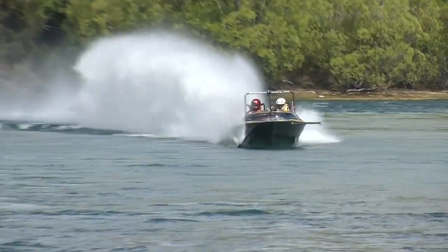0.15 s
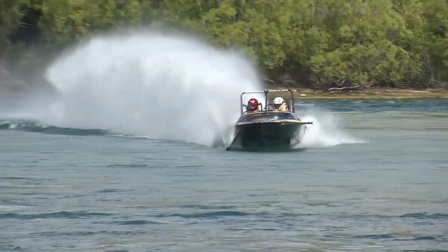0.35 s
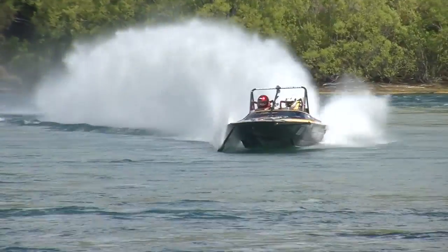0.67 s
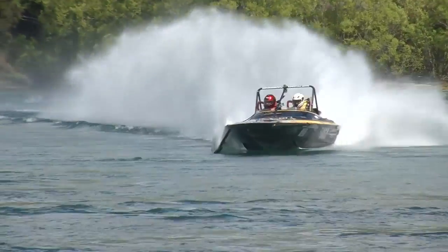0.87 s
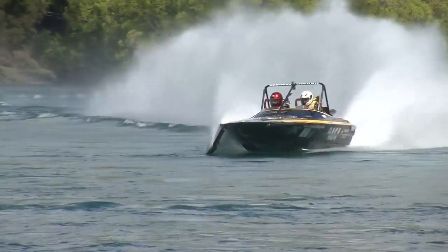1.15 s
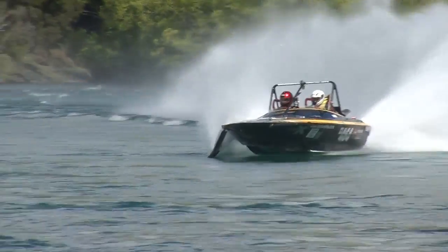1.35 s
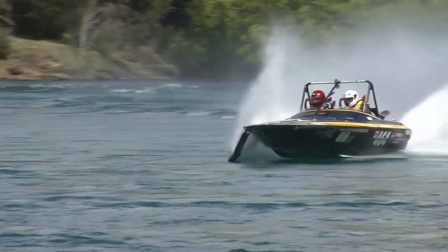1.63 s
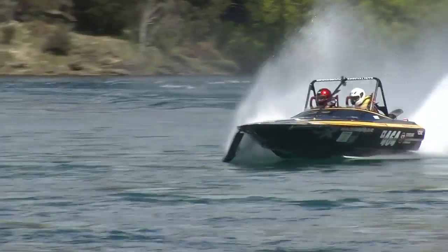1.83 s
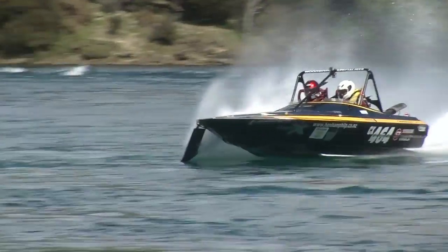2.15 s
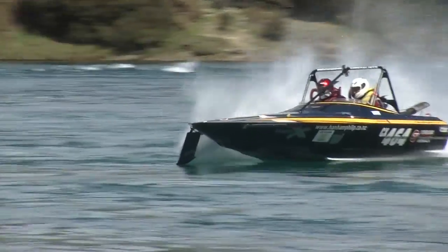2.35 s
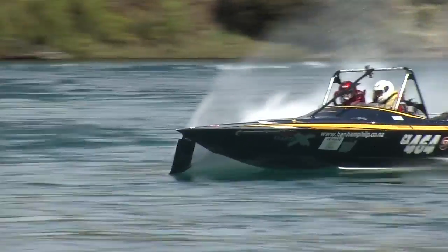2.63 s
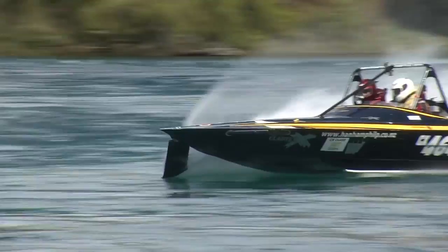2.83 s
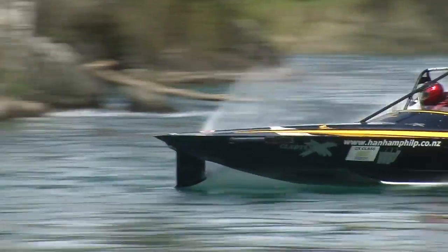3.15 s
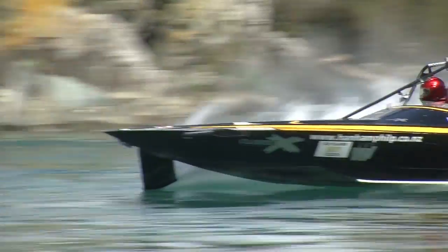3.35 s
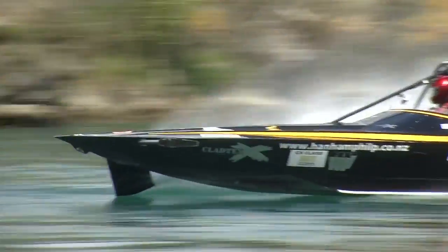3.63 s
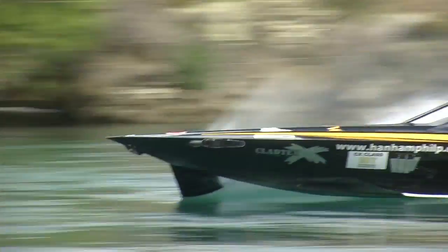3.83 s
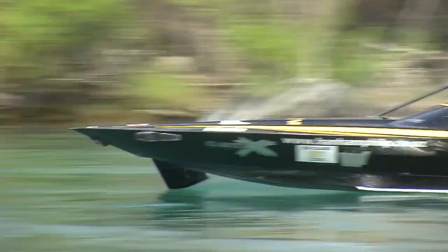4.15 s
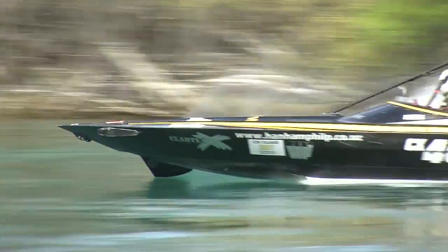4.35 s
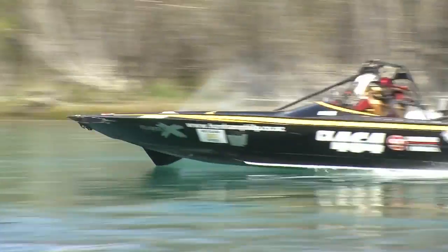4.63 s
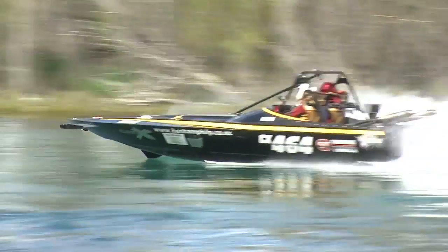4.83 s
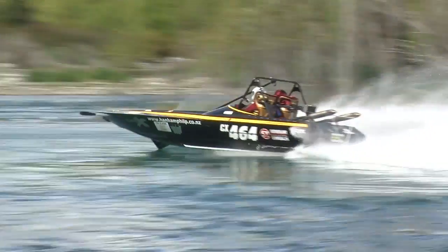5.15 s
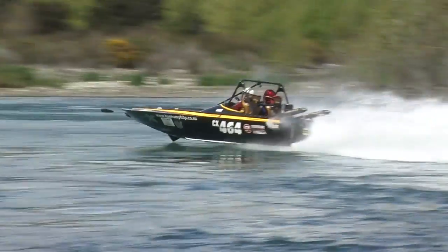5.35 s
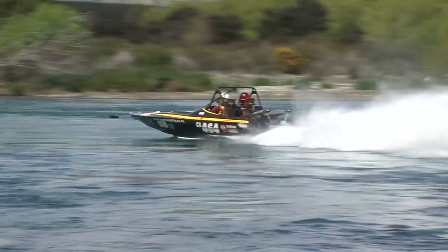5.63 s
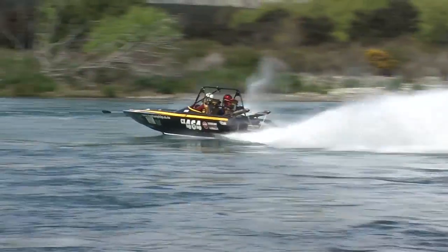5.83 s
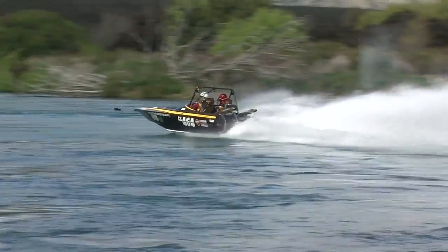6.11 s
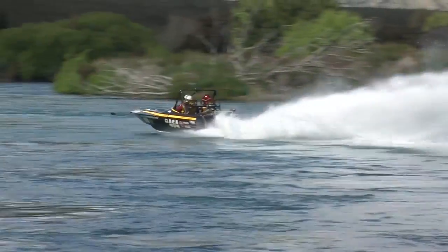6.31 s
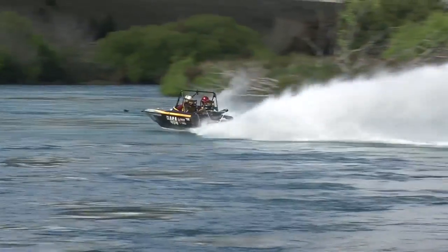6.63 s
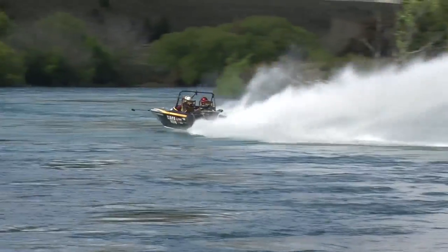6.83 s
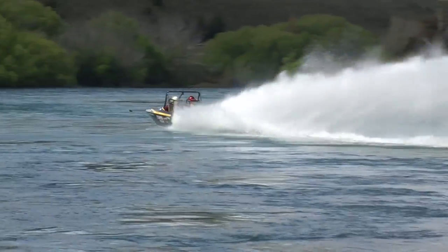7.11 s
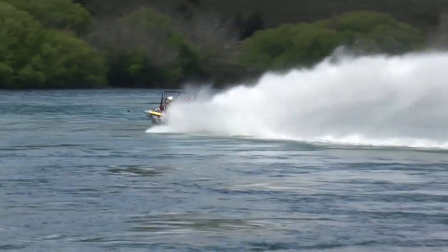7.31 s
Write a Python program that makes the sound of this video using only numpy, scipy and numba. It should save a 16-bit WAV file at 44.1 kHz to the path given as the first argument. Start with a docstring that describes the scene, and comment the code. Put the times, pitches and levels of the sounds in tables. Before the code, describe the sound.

At 0 s a V8 racing jet boat is already loud, coming toward the shore with a dense, lumpy open-exhaust drone, strong low boom and mid-range buzz. A fainter, lower-pitched return from the far bank makes it beat; tiny drops tick. From about 1.2 s the note slides gradually lower and spray begins to build. Around 2.7 s the engine eases off, its pitch falling sharply and roughening, while sheets of water rush and hiss until about 3.3 s. By 3.6 s the pitch has climbed back, raspy and full, passing close by. Near 5.1 s it drops abruptly again, then rises slowly. From 5.5 to 7.5 s the boat runs away, still loud, with throbbing firings, swelling roar around 6.2 s, airy jet wash and deep wake rumble. Outdoor microphone, strongly limited, sounding on the left; the right holds faint electronic hiss.

```python
"""On a river shore: a V8 racing jet boat comes up, eases off through a turn in a hiss of spray, passes and runs away.
Two open exhaust stacks give a lumpy note of engine orders that changes with the side they are heard from,
with noisy puffs at each firing. The far bank returns the note at a lower Doppler pitch, so it beats.
Coloured noise makes spray, drops and the rumble of the wake. A limited microphone carries the scene
on the left channel; the right holds only faint hiss."""
import sys
import numpy as np
from scipy import signal
from scipy.fft import rfft, irfft, next_fast_len
from scipy.io import wavfile
from scipy.ndimage import uniform_filter1d
from numba import njit

SR = 44100
rng = np.random.default_rng(int(sys.argv[2]) if len(sys.argv) > 2 else 0)


def output_pcm(signal):
    """Save a mono or channel-first signal as 16-bit PCM at the path in sys.argv[1].

    Samples are clipped to [-1, 1] before scaling.
    """
    pcm = np.clip(np.atleast_2d(signal).T, -1, 1) * 32767
    wavfile.write(sys.argv[1], SR, np.round(pcm).astype(np.int16))


N = 329427
TIME = np.arange(N) / SR


def undb(db):
    """Turn decibels into gain."""
    return 10 ** (np.asarray(db) / 20)


def unit(x):
    """Scale a sound to rms 1."""
    return x / np.sqrt(np.mean(x ** 2))


def curves(table):
    """Join each column of a table by straight lines in time."""
    s, *columns = np.transpose(table)
    return [np.interp(TIME, s, c) for c in columns]


def noise():
    """White noise: all pitches equally strong."""
    return rng.standard_normal(N)


def walk(rate):
    """Slow chance: random levels 1 / rate seconds apart, joined by straight lines; spread near 1."""
    step = max(int(SR / rate), 1)
    levels = rng.standard_normal(N // step + 2)
    lines = levels[:-1, None] + np.diff(levels)[:, None] * np.arange(step) / step
    return np.sqrt(3 / 2) * lines.ravel()[:N]  # makes up for the spread lost between levels


def colour(x, points):
    """Shape a sound by (Hz, dB) points, fading away outside them; rms 1."""
    hz, db = np.transpose(points)
    size = next_fast_len(N)
    freqs = np.maximum(np.fft.rfftfreq(size, 1 / SR), 1)
    gain = undb(np.interp(np.log(freqs), np.log(hz), db))
    gain = gain * np.minimum(hz.max() / freqs, 1) ** 2
    gain = gain * np.minimum(freqs / hz.min(), 1) ** 2
    return unit(irfft(rfft(x, size) * gain, size)[:N])


# How the boat turns past the listener.
# Each row: time in seconds, bearing in degrees (0 is bow on, 180 is stern on).
BEARING = [(0, 15.6), (1.22, 18.7), (1.45, 40.3), (2.2, 51), (2.62, 54.7), (2.9, 61), (3.08, 62.1),
           (3.42, 68), (3.78, 85), (4.5, 95.7), (4.92, 97.6), (5.25, 115), (5.48, 121), (5.72, 127),
           (6.0, 139), (6.28, 141), (6.65, 153), (6.88, 156), (7.47, 157)]


def by_side(table):
    """Read each column of a table of bearings as the boat turns past the listener."""
    bearing, = curves(BEARING)
    angles, *columns = np.transpose(table)
    return [np.interp(bearing, angles, c) for c in columns]


def swell(peak, rise, fall):
    """An envelope that builds up smoothly and dies away."""
    age = TIME - peak
    return np.exp(-(np.minimum(age, 0) / max(rise, .005)) ** 2 - np.maximum(age, 0) / max(fall, .005))


def with_swells(steady_db, events):
    """Gains of several layers: their steady levels plus every event's swell, summed in power."""
    power = undb(steady_db) ** 2
    for peak, rise, fall, *db in events:
        power = power + np.outer(undb(db) ** 2, swell(peak, rise, fall) ** 2)
    return np.sqrt(power)


# Engine speed as heard. Each row: time in seconds, four-stroke cycles per second (before the small wander).
CYCLE_SPEED = [(0.0, 44.84), (1.25, 42.2), (1.39, 40.83), (1.89, 39.36), (2.25, 38.8), (2.6, 39.32),
               (2.79, 34.95), (2.95, 34.2), (3.13, 33.82), (3.55, 39.45), (3.76, 40.64), (4.1, 39.95),
               (4.58, 38.56), (4.95, 38.3), (5.16, 35.1), (5.28, 35.42), (5.45, 36.4), (5.8, 36.98),
               (6.23, 38.67), (6.55, 38.97), (6.8, 39.76), (7.05, 39.56), (7.47, 39.33)]


def engine_turns(shudder=.0018, surging=0.001):
    """Count engine cycles; the speed wanders by small shares, quickly and slowly, as the pump's load changes."""
    cycle_hz, = curves(CYCLE_SPEED)
    wander = 1 + shudder * walk(40) + surging * walk(6)
    return np.cumsum(cycle_hz * wander) / SR


def order_levels(side):
    """List one side's exhaust note as gains of the orders 0 to 45."""
    gains = np.zeros(46)
    for order, db in side:
        gains[order] = undb(db)
    return gains


def push(note, size=220):
    """Strength of the note from firing to firing, relative to its mean over a few cycles (size in samples)."""
    power = uniform_filter1d(uniform_filter1d(note ** 2, size), size // 2) + 1e-9
    return np.sqrt(power / uniform_filter1d(power, 20 * size))


# The exhaust note heard from each side, from bow to stern.
# Each row: order (multiple of the cycle speed), level in dB before flutter.
HEAD_ON = [(2, -56.5), (3, -40), (4, -44), (6, -31), (7, -38), (9, -45), (10, -37.5), (11, -40), (12, -50),
           (13, -43), (15, -52), (16, -41), (17, -51.5), (21, -58), (23, -54.5), (24, -52.5)]
BOW = [(2, -60), (3, -42), (4, -52), (6, -32), (7, -41.5), (9, -45), (10, -36.5), (11, -36), (12, -52.5),
       (13, -51.5), (14, -47.5), (16, -49.5), (18, -49.5), (21, -53), (23, -59), (26, -60.5)]
SHOULDER = [(2, -59), (3, -37.5), (6, -27.5), (7, -46.5), (9, -40), (10, -50), (11, -42.5), (12, -47.5),
            (13, -34.5), (14, -48.5), (15, -53.5), (16, -52.5), (17, -41), (18, -51), (19, -46.5),
            (21, -49.5), (22, -62), (25, -60.5), (29, -59), (34, -64)]
FORE = [(2, -57.5), (3, -43), (6, -35.5), (7, -34), (9, -35), (11, -37.5), (12, -47), (13, -32),
        (15, -40.5), (16, -42), (17, -45.5), (20, -45.5), (21, -41.5), (22, -44.5), (27, -46), (32, -49.5),
        (33, -53.5), (34, -48)]
FLANK = [(2, -58.5), (3, -38.5), (6, -36), (7, -35), (9, -34), (11, -32), (12, -44), (13, -32.5),
         (14, -55.5), (15, -49.5), (16, -40), (17, -50), (19, -53.5), (20, -49), (21, -51.5), (22, -59.5),
         (24, -57), (27, -55), (29, -62), (32, -60), (33, -57), (34, -56)]
BEAM = [(2, -61.5), (3, -37), (4, -52.5), (6, -45.5), (7, -34.5), (9, -31.5), (10, -39.5), (11, -32.5),
        (12, -42.5), (13, -45.5), (14, -39.5), (16, -42), (17, -46), (19, -42.5), (21, -39.5), (22, -48),
        (24, -45.5), (27, -47.5), (29, -47.5), (31, -50.5), (32, -50.5), (33, -53), (34, -58), (37, -57.5),
        (39, -59.5)]
ABAFT = [(2, -60.5), (3, -38), (4, -50.5), (6, -44.5), (7, -33.5), (9, -30), (10, -41.5), (11, -36),
         (12, -44), (13, -52), (14, -40.5), (16, -43.5), (19, -40.5), (21, -39.5), (22, -47.5), (24, -47),
         (27, -49), (29, -50), (31, -52), (32, -50.5), (33, -48.5), (36, -54.5)]
AFT = [(3, -38.5), (4, -49.5), (6, -35.5), (7, -35), (9, -29.5), (10, -41), (11, -33.5), (12, -42.5),
       (13, -34.5), (14, -56.5), (16, -48), (19, -48.5), (21, -38.5), (22, -50), (25, -49.5), (27, -48),
       (28, -50.5), (29, -53), (30, -47.5), (32, -42.5), (34, -53.5), (37, -63)]
QUARTER = [(3, -36), (4, -49), (6, -35.5), (7, -31), (9, -28), (10, -39), (11, -28.5), (12, -48), (13, -37),
           (15, -44.5), (16, -43), (17, -44.5), (18, -42), (19, -47), (20, -43.5), (21, -42), (22, -42.5),
           (23, -39), (24, -49.5), (25, -37.5), (27, -47.5), (29, -58.5), (32, -51.5), (34, -58.5),
           (43, -63.5), (45, -55)]
TRANSOM = [(3, -38), (4, -47), (6, -35), (7, -39.5), (9, -27), (10, -48), (11, -35), (12, -49), (13, -35),
           (15, -40.5), (17, -41.5), (18, -45), (19, -43.5), (20, -46.5), (21, -49.5), (22, -43), (24, -50),
           (26, -48.5), (29, -48.5), (35, -48.5), (37, -56.5), (43, -58.5)]
STERN = [(3, -38), (4, -40), (6, -32), (7, -30), (9, -35.5), (10, -34), (11, -33), (12, -42), (13, -36.5),
         (14, -47), (15, -38.5), (16, -43), (17, -49.5), (18, -58.5), (19, -41.5), (20, -48), (21, -40),
         (22, -46), (24, -61), (26, -48), (29, -56.5), (32, -52.5), (34, -55), (35, -54), (37, -59.5),
         (43, -59)]
# Where those notes are heard. Each row: bearing in degrees, the note's table.
NOTES = [(16, HEAD_ON), (18, BOW), (52, SHOULDER), (61, FORE), (68, FLANK), (86, BEAM), (90, BEAM),
         (96, ABAFT), (102, ABAFT), (120, AFT), (131, QUARTER), (144, TRANSOM), (158, STERN)]
# The two strongest orders by side.
# Each row: bearing in degrees, boom at order 5 in dB, firing tone at order 8 in dB, both before flutter.
LEADING_ORDERS = [(16.2, -31, -25.5), (17.78, -30.5, -23), (39, -24.5, -28), (49.8, -26.5, -25),
                  (55.7, -23.5, -35), (60.7, -24.5, -26), (67.5, -22.5, -42.5), (85, -23.5, -28.5),
                  (96.3, -23, -30.5), (104, -23.5, -30.5), (122, -24.5, -48.5), (134, -22, -39),
                  (146, -24, -32), (156, -24, -29)]
# Throb once a cycle. Each row: bearing in degrees, extra contrast between strong and weak firings (0 to 1).
THROB = [(60, 0.05), (95, 0.1), (122, 0.3), (145, 0.45), (160, 0.3)]
# Uneven burning, worst off the throttle. Each row: time in seconds, scatter of the orders' strength in dB.
ROUGHNESS = [(0, 0.4), (2.5, 1.6), (2.8, 2), (3.3, 4), (3.7, 0.2), (4.95, 1), (5.15, 2.2), (5.5, 0.2),
             (6.3, 0.7), (6.6, 1.5), (7.47, 2)]
# Firing slots of the near cylinder bank. Each entry: a slot in eighths of a cycle.
NEAR_BANK_SLOTS = [0, 3, 5, 6]
# Strength of the near bank's four cylinders. Each entry: relative level in dB.
CYLINDER_DB = [-1, -2, -6, -4]


def exhaust_note(turns, pipe_lag=0.95, mouth_rad=1.32, blur_rad=0.26, flutter_db=1.02, fade_db=0.8,
                 boom_flutter_db=1.49, stumble=.3, drift_rad=.6, bank_boom_db=-18):
    """Add up the engine orders of the exhaust note, low and high, as sent to the shore and as sent astern."""
    boom_db, firing_db = by_side(LEADING_ORDERS)
    bearing, = curves(BEARING)
    rough_db, = curves(ROUGHNESS)
    angles = [angle for angle, _ in NOTES]
    gains = np.array([order_levels(side) for _, side in NOTES])
    leading = {5: undb(boom_db), 8: undb(firing_db)}
    astern_gains = gains[-1].copy()
    astern_gains[5] += undb(bank_boom_db)
    direct, astern = 0, 0
    for k in sorted(set(np.flatnonzero(gains.sum(axis=0))) | set(leading)):
        # uneven firing of one bank sets how the orders line up
        slot_phases = np.exp(-2j * np.pi * k * np.array(NEAR_BANK_SLOTS) / 8)
        pattern = (undb(CYLINDER_DB) * slot_phases).sum()
        # short waves arrive by many paths over the water, so their phases drift apart
        drift = 2 * np.pi * rng.random() + drift_rad * walk(9) + blur_rad * rough_db * walk(35)
        drift = np.clip((k - 12) / 6, 0, 1) * drift
        # the pipe lets the low orders out first; its open mouth turns them all
        pipe_phase = mouth_rad + 2 * np.pi * pipe_lag * np.log(k) ** 2
        phase = 2 * np.pi * k * turns + drift + np.angle(pattern + 1e-6) + pipe_phase
        tone = np.sqrt(2) * np.cos(phase)
        if k in leading:
            gain = leading[k] * undb(boom_flutter_db * walk(10))
        else:
            gain = np.interp(bearing, angles, gains[:, k])
            # paths over the waves flutter and fade
            gain = gain * undb(flutter_db * walk(13) + fade_db * walk(2.977))
            # uneven burning trades strength among the orders
            gain = gain * undb(rough_db * walk(24))
        direct = direct + gain * tone
        astern = astern + astern_gains[k] * tone
    # from astern the strong firings stand out and the weak ones leave a gap once a cycle
    throb = direct * (push(direct) ** by_side(THROB)[0] - 1)
    above_boom = signal.butter(4, 150, "high", fs=SR, output="sos")
    direct = direct + signal.sosfiltfilt(above_boom, throb)
    return direct * undb(stumble * rough_db * walk(45)), astern


# Firing slots of the far cylinder bank. Each entry: a slot in eighths of a cycle.
FAR_BANK_SLOTS = [1, 2, 4, 7]


def firings(turns, far_stack_db=-9, stack_lag_s=0.00088, jitter_s=.00005, scatter_db=2):
    """Make a pulse per cylinder; the far stack is weaker and arrives a little later."""
    slots = np.arange(int(turns[-1] * 8))
    chance = rng.standard_normal((len(slots), 2))
    far = np.isin(slots % 8, FAR_BANK_SLOTS)
    times = np.interp(slots / 8, turns, TIME)
    at = np.clip((times + far * stack_lag_s + jitter_s * chance[:, 0]) * SR, 0, N - 2)
    size = undb(far * far_stack_db + scatter_db * chance[:, 1])
    # share each pulse between the two samples around its exact time
    whole = at.astype(int)
    early = np.bincount(whole, size * (1 - at + whole), N)
    late = np.bincount(whole + 1, size * (at - whole), N)
    return early + late


@njit
def ring(x, hz, width):
    """Ring like a hollow pipe: a state-variable band-pass whose centre moves."""
    out, band, low = np.empty(len(x)), 0., 0.
    for i in range(len(x)):
        g, k = np.tan(np.pi * hz[i] / SR), width / hz[i]
        v = (band + g * (x[i] - low)) / (1 + g * (g + k))
        band, low, out[i] = 2 * v - band, low + 2 * g * v, k * v
    return out


# Level of the exhaust's rasp. Each row: time in seconds, level in dB before the mix and trims.
RASP_LEVEL = [(0.0, -43), (0.65, -45), (1.02, -41.5), (2.14, -38.5), (3.01, -34.5), (3.35, -37.5),
              (3.83, -34), (4.5, -37), (4.8, -38), (5.08, -44), (5.3, -35), (6.2, -26.5), (6.36, -33.5),
              (6.62, -34), (7.1, -32.5), (7.47, -35.5)]
# What the rasp is made of, by side.
# Each row: bearing in degrees, roar in dB, bark of the firings in dB, both added to the rasp level.
RASP_MIX = [(18, 9.5, -4), (58.3, 5, -6), (80, -1.5, -15), (94, 2.5, -4), (118.4, 1.5, -6),
            (129, -6.5, -14.5), (170, -3, -7.5)]
# Brief swells of the exhaust.
# Each row: peak time, rise and fall in seconds, then roar and bark in dB before trims.
EXHAUST_SWELLS = [(2.5, 0.12, 0.098, -37, -42), (2.92, .1, 0.38, -35.5, -35), (3.6, .03, 0.051, -35, -40),
                  (4.32, .15, .2, -44, -41.5), (5.83, 0.092, .2, -39, -40.5),
                  (6.6, 0.061, 0.083, -33, -33.5), (6.76, 0.041, 0.081, -33, -40),
                  (7.44, 0.09, 0.19, -27, -48)]
# The mouth of the stack rings at a pitch that shifts as the boat turns.
# Each row: bearing in degrees, ring in Hz, its level in dB within the bark.
STACK_RING = [(18, 930, -14.5), (55, 800, -11), (58.7, 600, -12), (67.5, 840, -16), (88, 1000, -9),
              (92.8, 1500, -5), (102, 1000, -7), (120.7, 1300, -6.5), (127.6, 920, 0), (141.3, 1300, -11.5),
              (160, 940, -13.5)]
# Tone colour of the turbulent roar. Each row: frequency in Hz, relative level in dB.
ROAR_COLOUR = [(40, -42.5), (60, -25), (85, -10), (130, 2), (200, 2), (330, 8), (480, 4), (600, 3),
               (780, 0.5), (1000, -9.5), (1500, -22.5), (3000, -45)]
# Tone colour of the bark of each firing. Each row: frequency in Hz, relative level in dB.
BARK_COLOUR = [(300, -41.5), (520, -8.5), (700, 0), (900, -3), (1150, 12.5), (1450, -0.5), (1750, -17),
               (2500, -30.5), (5000, -48.5)]
# Tone colour of the puffs of gas. Each row: frequency in Hz, relative level in dB.
GAS_COLOUR = [(500, -22.5), (850, 1), (1100, 1), (1500, -11.5), (1900, -16), (3000, -38.5)]


def exhaust_rasp(pulses, pressure, gating=.55, puff_s=0.0051, steady=0.3,
                 roar_db=-0.5, bark_db=-14, gas_db=0, ring_width_hz=200.0):
    """Each firing barks and lets out a puff of turbulent gas that rings the stack; now and then they swell."""
    steady_db = curves(RASP_LEVEL)[0] + np.array(by_side(RASP_MIX))
    roar_gain, bark_gain = with_swells(steady_db, EXHAUST_SWELLS)
    # each pulse starts a puff that dies away over puff_s
    puffs = steady + unit(signal.lfilter([1], [1, -np.exp(-1 / (puff_s * SR))], pulses))
    roar = colour(pressure ** gating * puffs * noise(), ROAR_COLOUR) * undb(roar_db)
    # two passes through the same ring make it sharper
    ring_hz, ring_db = by_side(STACK_RING)
    once = ring(puffs * noise(), ring_hz, ring_width_hz)
    hollow = unit(ring(once, ring_hz, ring_width_hz)) * undb(ring_db)
    bark = colour(pulses, BARK_COLOUR) * undb(bark_db)
    gas = colour(puffs * noise(), GAS_COLOUR) * undb(gas_db)
    return roar * roar_gain + (bark + gas + hollow) * bark_gain, unit(puffs)


# Steady wash of hull and jet by side, its fine mist stronger from astern.
# Each row: bearing in degrees, then rush, hiss and fine mist in dB before trims.
WASH = [(18, -51, -61, -75.5), (55, -51, -57.5, -71.5), (72, -54, -59, -69), (86, -51.5, -58.5, -67.5),
        (93.86, -57.5, -60, -65.5), (96.97, -53.5, -56, -66), (129, -53, -54, -62.5),
        (158, -52.5, -57.5, -66)]
# Sheets of spray thrown by the hull.
# Each row: peak time, rise and fall in seconds, then rush, hiss and fine mist in dB before trims.
SPRAY_SHEETS = [(1.001, .25, 0.38, -50.5, -63, -85.5), (1.25, 0.16, 0.32, -51, -60, -82.5),
                (1.92, 0.12, .2, -49.5, -58, -75), (2.12, 0.069, 0.044, -49.5, -66, -70.5),
                (2.45, .015, 0.047, -60, -61, -64), (2.53, 0.022, .04, -55, -58, -65),
                (2.639, 0.033, .25, -44, -47, -60), (2.75, 0.087, 0.18, -46, -52, -57),
                (2.89, 0.037, 0.18, -41, -45.5, -54.5), (3.05, .04, 0.13, -48.5, -49, -58.5),
                (3.16, 0.027, .1, -47, -54, -61), (3.25, 0.032, 0.14, -44.5, -52.5, -61),
                (4.0, .02, .06, -49.5, -58, -62), (4.34, 0.044, 0.075, -54, -75, -67),
                (4.54, 0.054, 0.099, -53, -74, -65.5), (5.7, 0.13, 0.3, -53, -53.5, -65.5),
                (5.9, .12, .25, -59, -49.5, -66), (6.09, 0.08, .19, -49.5, -48.5, -65),
                (6.51, .08, 0.33, -54, -52, -69), (6.82, .2, .17, -53, -51.5, -68.5)]
# Tone colour of the low rush of water. Each row: frequency in Hz, relative level in dB.
RUSH_COLOUR = [(800, -28), (1400, 4), (1750, 0), (2400, -3.5), (3100, -11.5), (4500, -32.5)]
# Tone colour of the hiss of spray. Each row: frequency in Hz, relative level in dB.
HISS_COLOUR = [(1900, -18.5), (2700, -2.5), (3300, 1), (4200, -4), (5200, -9), (6200, -27.5), (9000, -42.5)]
# Tone colour of the fine mist. Each row: frequency in Hz, relative level in dB.
MIST_COLOUR = [(4000, -21), (5500, 3.5), (6500, 0), (8400, -3), (9200, -8), (10200, -18.5), (12700, -26),
               (13500, -36.5)]


def spray(puffs, throb=.25, surge_db=0.75, slosh_db=0.47, grain_db=2, rush_db=3.5, hiss_db=2.0, mist_db=0):
    """Sheets of water break into drops of all sizes; the jet throbs slightly with the engine."""
    surge = undb(surge_db * walk(45) + slosh_db * walk(14)) * (1 - throb + throb * puffs)
    gains = with_swells(by_side(WASH), SPRAY_SHEETS)
    colours = (RUSH_COLOUR, HISS_COLOUR, MIST_COLOUR)
    water = 0
    for gain, shape, trim_db in zip(gains, colours, (rush_db, hiss_db, mist_db)):
        grains = noise() * surge * undb(grain_db * walk(2500))
        water = water + colour(grains, shape) * gain * undb(trim_db)
    return water


# Echo from the far bank. Each row: time in seconds, level in dB.
ECHO_LEVEL = [(0, -33.5), (0.8, -34), (1.15, -34), (1.8, -29.5), (2.5, -33), (3.2, -36), (3.9, -38),
              (4.6, -47.5), (7.47, -51)]
# Reflecting stretches of the bank.
# Each row: delay in seconds, growth of the delay in seconds per second, relative level in dB.
BANK_STRETCHES = [(.007, 0.087, 6.5), (.05, 0.079, -3), (0.0922, 0.1, -6)]


def bank_echo(astern, low_hz=105, top_hz=510, wander_s=.0006, flicker_db=4.0):
    """The boat runs from the bank behind it: growing paths flatten the echoes; the uneven bank blurs them."""
    echo = 0
    for delay, growth, db in BANK_STRETCHES:
        sent_at = TIME - delay - growth * TIME + wander_s * walk(18)
        echo = echo + undb(db + flicker_db * walk(9)) * np.interp(sent_at, TIME, astern, left=0)
    band = signal.butter(4, [low_hz, top_hz], "band", fs=SR, output="sos")
    dull = signal.sosfilt(band, echo)
    return unit(dull) * undb(curves(ECHO_LEVEL)[0])


# Drops that land close by. Each row: time in seconds, peak level in dB before the trim.
DROPS = [(0.105, -54), (0.2, -53), (0.2607, -52), (0.583, -51), (0.7512, -52), (6.8746, -45)]


def drops(ring_s=.002, drop_db=-5):
    """Lone drops tick faintly near the microphone: short bursts of noise that die away over ring_s."""
    ticks = sum(undb(db + drop_db) * (TIME >= s) * np.exp(-np.abs(TIME - s) / ring_s) for s, db in DROPS)
    return ticks * colour(noise(), [(2500, -8.0), (5000, 6), (9000, 2), (12000, -16)])


# Rasp and spray briefly dip or lift. Each row: time in seconds, change in dB (below 0 is a dip).
LEVEL_DIPS = [(0.73, 1), (1.71, -1.5), (1.94, -2), (2.19, -4.5)]


def dips(rise_s=.018, fall_s=0.039):
    """Gain of the brief level changes in rasp and spray."""
    return undb(sum(db * swell(s, rise_s, fall_s) for s, db in LEVEL_DIPS))


# Rumble of the churned wake. Each row: time in seconds, level in dB.
WAKE_LEVEL = [(0, -89), (1.15, -87.5), (1.3, -66), (2, -66.5), (3, -60), (4.5, -64), (7.47, -65)]
# Tone colour of that rumble. Each row: frequency in Hz, relative level in dB.
RUMBLE_COLOUR = [(25, -3.5), (45, 0), (70, -1), (120, -13)]


def wake_rumble():
    """Churned water rumbles: deep noise that follows the wake's level."""
    return colour(noise(), RUMBLE_COLOUR) * undb(curves(WAKE_LEVEL)[0])


def scene():
    """Engine, echo and water at one point on the shore, on the left channel only."""
    turns = engine_turns()
    note, astern = exhaust_note(turns)
    rasp, puffs = exhaust_rasp(firings(turns), push(note))
    shore = note + (rasp + spray(puffs)) * dips()
    shore = shore + bank_echo(astern) + drops() + wake_rumble()
    return np.array([2 * shore, np.zeros(N)])


@njit
def follow(x, attack, release):
    """Follow the loudness with an envelope that rises fast and falls slowly."""
    out, e = np.empty(len(x)), 0.
    for i in range(len(x)):
        e += (abs(x[i]) - e) * (attack if abs(x[i]) > e else release)
        out[i] = e
    return out


# Tone colour of the electronic hiss. Each row: frequency in Hz, relative level in dB.
SELF_NOISE_COLOUR = [(30, 0), (15700, 0)]


def record(dry, drive_db=-1.04, ceiling_db=-8.5, attack_s=.0001, release_s=0.057, top_hz=15700):
    """A fast limiter holds the peaks; both channels carry faint electronic hiss; the top is cut."""
    driven = dry * undb(drive_db)
    attack = 1 - np.exp(-1 / (attack_s * SR))
    release = 1 - np.exp(-1 / (release_s * SR))
    envelope = follow(driven[0], attack, release)
    limited = driven / np.maximum(envelope / undb(ceiling_db), 1)
    hiss = undb(-73.2) * np.array([colour(noise(), SELF_NOISE_COLOUR) for _ in dry])
    top_cut = signal.ellip(8, .2, 70, top_hz, fs=SR, output="sos")
    return signal.sosfilt(top_cut, limited + hiss)


dry = scene()
out = record(dry)
output_pcm(out)
```